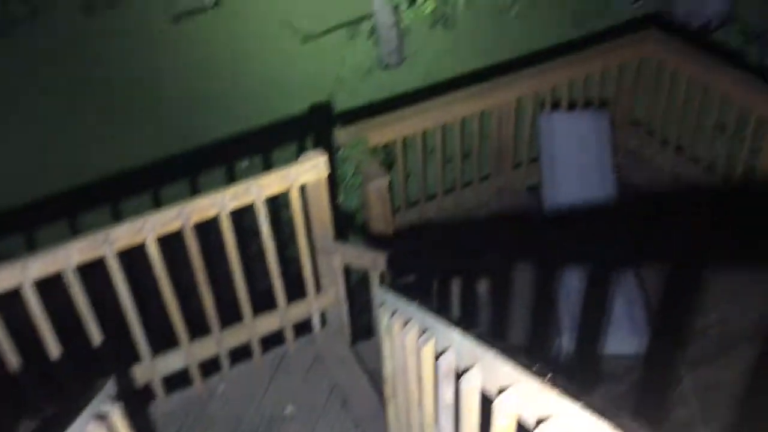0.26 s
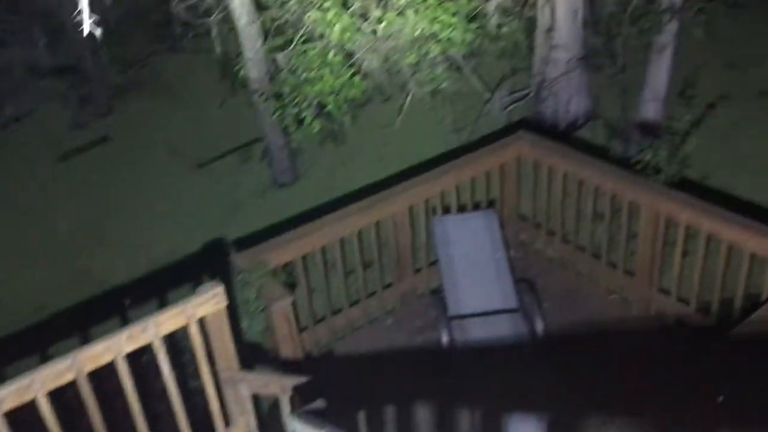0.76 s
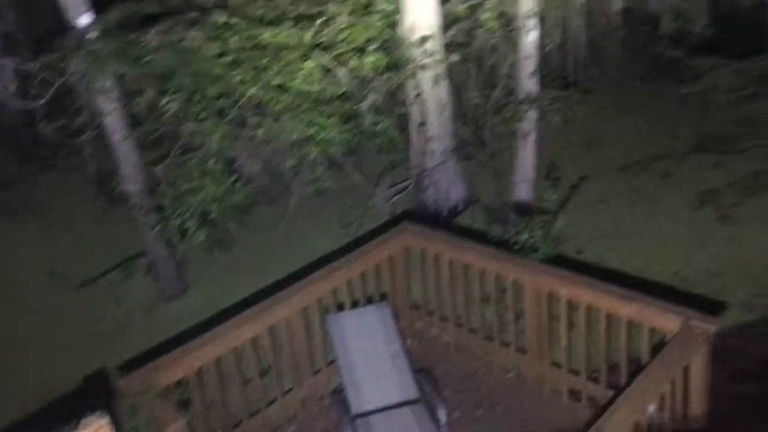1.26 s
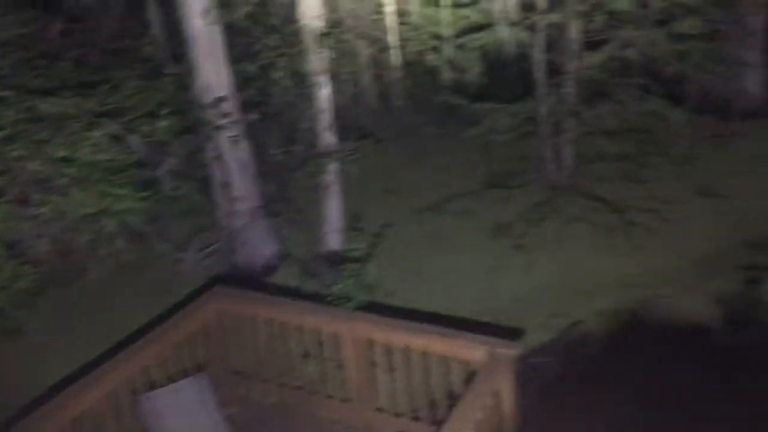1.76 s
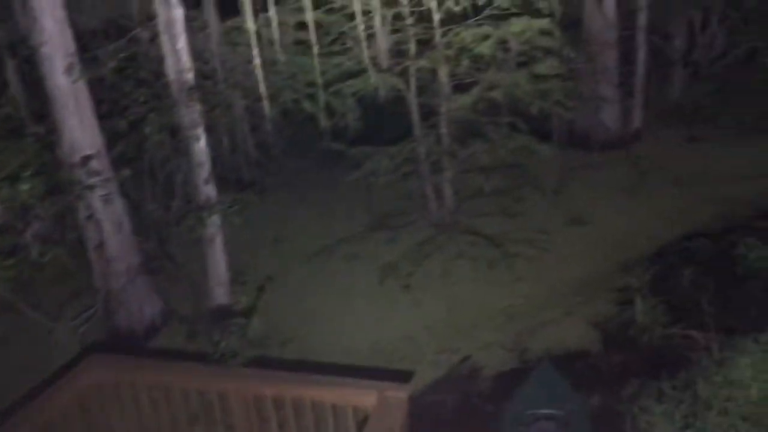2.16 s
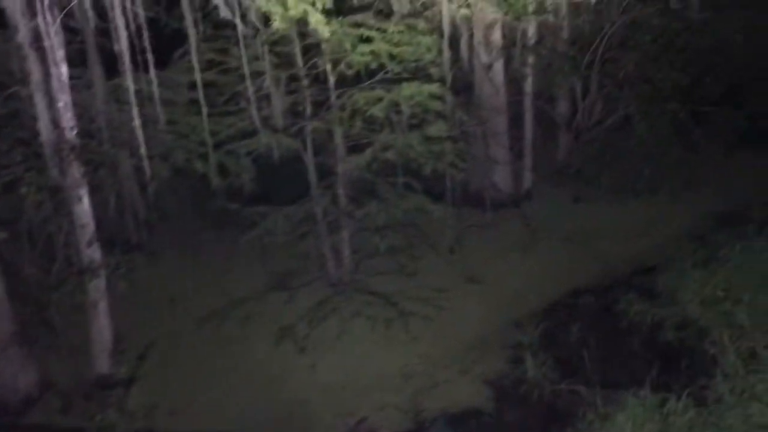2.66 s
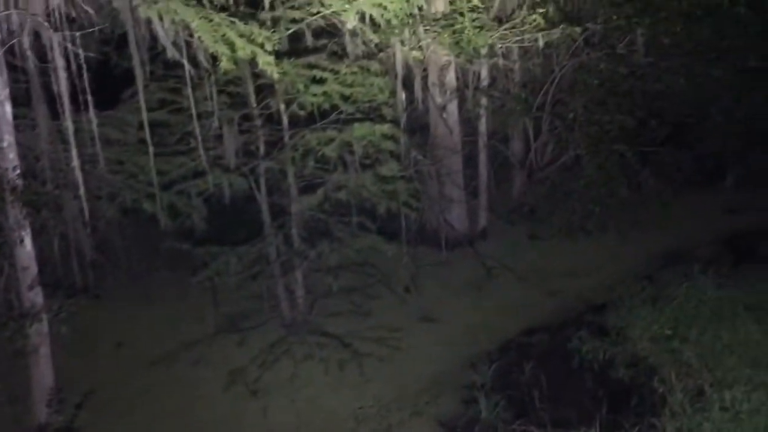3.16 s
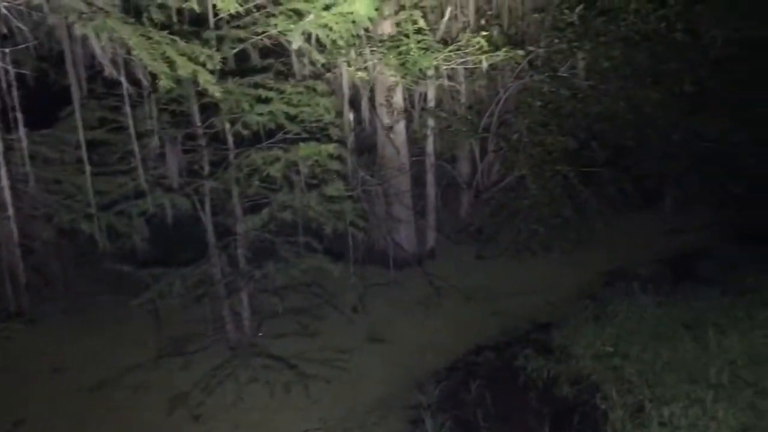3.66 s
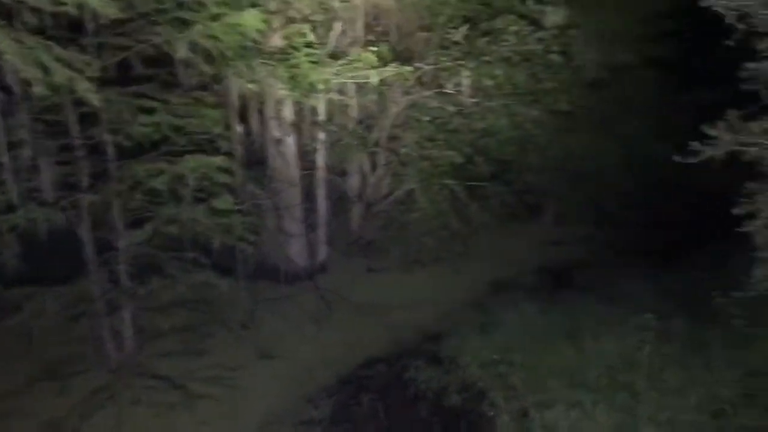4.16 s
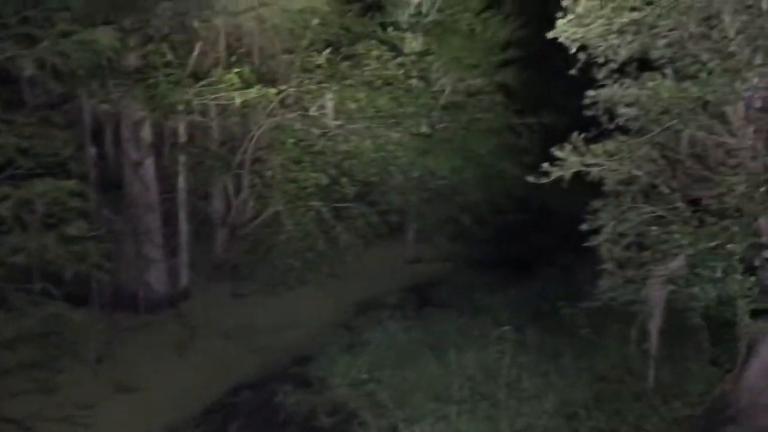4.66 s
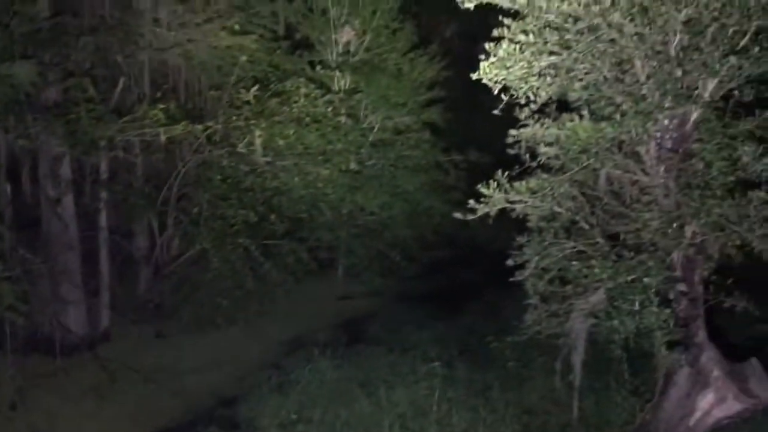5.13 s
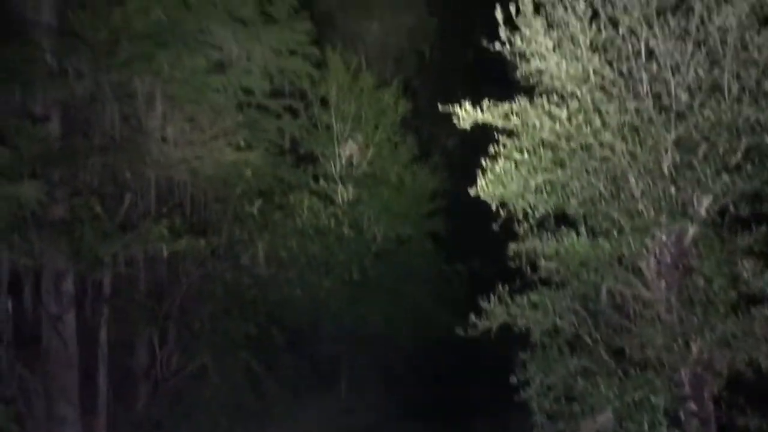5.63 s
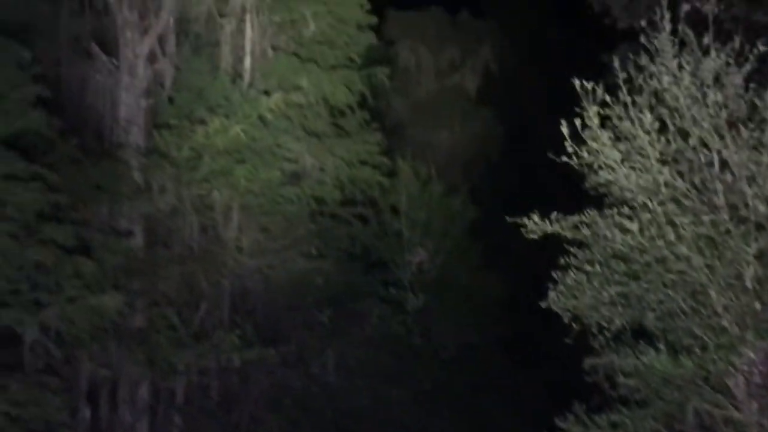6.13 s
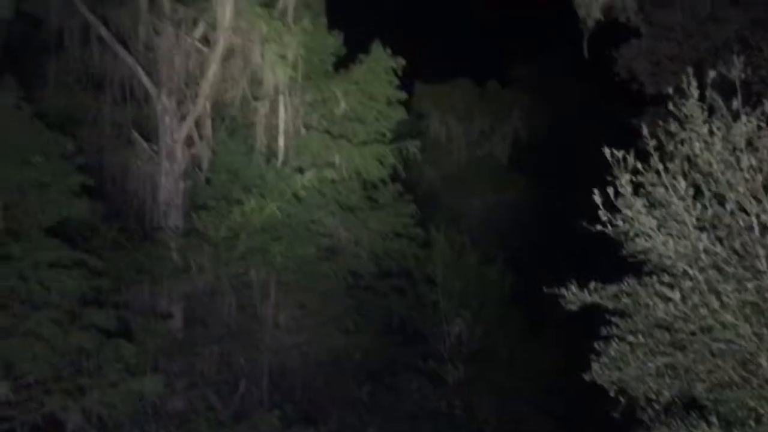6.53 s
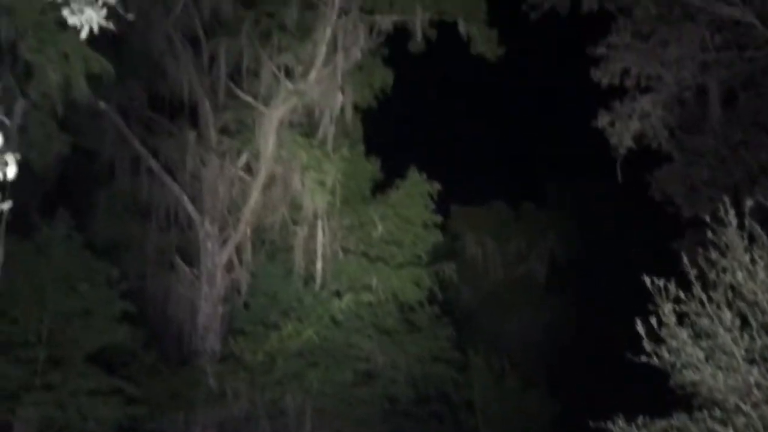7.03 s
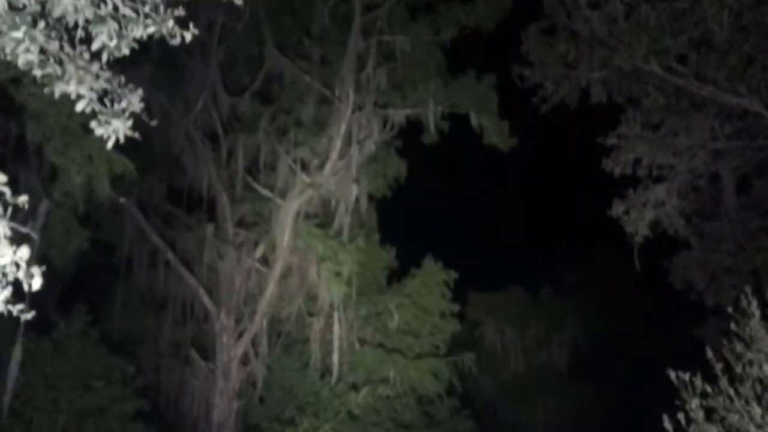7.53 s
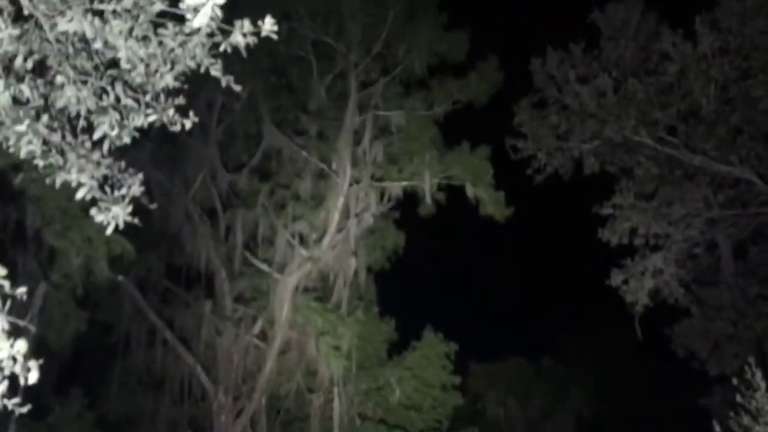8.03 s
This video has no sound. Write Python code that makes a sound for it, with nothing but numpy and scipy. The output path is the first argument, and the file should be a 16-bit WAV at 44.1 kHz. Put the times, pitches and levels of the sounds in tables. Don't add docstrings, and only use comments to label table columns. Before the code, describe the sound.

At night in a swamp, hundreds of frogs give raspy nasal quacks while crickets shimmer above and a distant engine hums faintly below.

```python
import sys
import numpy as np
from scipy import signal
from scipy.fft import rfft, irfft, next_fast_len
from scipy.io import wavfile
from scipy.ndimage import uniform_filter1d, minimum_filter1d

SR = 44100
rng = np.random.default_rng(int(sys.argv[2]) if len(sys.argv) > 2 else 0)


def log_audio(samples):
    frames = np.atleast_2d(samples).T
    limited = np.clip(frames, -1, 1)
    pcm = np.round(limited * 32767).astype(np.int16)
    wavfile.write(sys.argv[1], SR, pcm)


def voltage_ratio(decibels):
    exponent = np.asarray(decibels, float) / 20
    return 10 ** exponent


N = 365588
T = np.arange(N) / SR


def evened(x):
    return x / np.sqrt(np.mean(x ** 2) + 1e-20)


def curves(rows, t):
    s, *columns = np.transpose(rows)
    return [np.interp(t, s, c) for c in columns]


def read(points, hz):
    f, value = np.transpose(points)
    return np.interp(np.log(hz + 1), np.log(f + 1), value, left=-90, right=-90)


def colour(x, points):
    size = next_fast_len(N)
    gain = voltage_ratio(read(points, np.fft.rfftfreq(size, 1 / SR)))
    return evened(irfft(rfft(x, size) * gain, size)[:N])


def add(mix, s, sound):
    part = mix[round(s * SR):][:len(sound)]
    part += sound[:len(part)]


def ring(x, hz, width_hz):
    return signal.lfilter(*signal.iirpeak(hz, hz / width_hz, SR), x)


def drift(hz):
    steps = rng.standard_normal(600)
    return np.interp(T * hz, np.arange(600), steps)


def woods(x, t60_s, gap_s):
    t = np.arange(SR // 2) / SR
    tail = rng.standard_normal(len(t)) * voltage_ratio(-60 * t / t60_s) * (t > gap_s)
    return signal.fftconvolve(x, tail / np.linalg.norm(tail))[:len(x)]


def strokes(turns, duty):
    return np.sin(np.pi * np.clip(turns % 1 / duty, 0, 1))


# frequency in Hz, density in dB per Hz.
RUMBLE = [(16, -53), (28, -34), (43, -1), (70, 1.5), (92, -0.5), (144, -10), (233, -12), (270, -16),
          (326, -14), (371, -20.5), (599, -24.5), (900, -27.5), (1170, -41), (1980, -120)]
# time in seconds, level in dB.
RUMBLE_DB = [(0.0, -57.5), (1.6, -59.5), (3.3, -58.5), (8.29, -58)]


def road():
    return voltage_ratio(curves(RUMBLE_DB, T)[0]) * colour(rng.standard_normal(N), RUMBLE)


# time in seconds, pitch in Hz, level in dB.
MOTOR = [
    (4.9, 198, -89.5),
    (5.2, 198.6, -64.5),
    (5.9, 203.4, -70),
    (6.3, 201.6, -72.5),
    (7.0, 206, -69.5),
    (7.5, 204.8, -80),
    (7.9, 205, -86),
]


def steady_motor():
    hz, db = curves(MOTOR, T)
    tone = np.exp(2j * np.pi * np.cumsum(hz + 1.52 * drift(5)) / SR)
    return voltage_ratio(db) * (tone + 0.23 * tone ** 2).real


# time in seconds, shaft rate in Hz.
ENGINE = [
    (1.5, 40.35),
    (4, 43.92),
    (7, 47.07),
    (8.29, 48.4),
]
# frequency in Hz, width in Hz, level in dB.
PIPE = [(84, 2.9, -62.5), (89.54, 3.5, -59), (92.77, 2.6, -57), (168.8, 4.2, -66), (175.4, 4, -67),
        (182.7, 3.1, -65.5), (190.7, 3.1, -67), (143.5, 2, -72), (224.5, 9, -71), (259.8, 3.5, -68),
        (267, 3, -72.5), (274, 3.2, -71), (368.4, 10, -77), (281, 4.8, -72.5)]


def far_engine():
    shaft_hz = curves(ENGINE, T)[0]
    turn = 2 * np.pi * np.cumsum(shaft_hz + .5 * drift(12)) / SR
    engine = np.zeros(N)
    for order in 2, 3, 4, 5, 6, 8:
        power = sum(voltage_ratio(db - 11 * ((order * shaft_hz - hz) / width) ** 2) ** 2 for hz, width, db in PIPE)
        waver = voltage_ratio((1.5 + 0.19 * order) * drift(9))
        engine += np.sqrt(power) * waver * np.sin(order * turn)
    return engine


def far_traffic():
    fade = np.clip(T / ENGINE[0][0], 0, 1) * np.sqrt(2)
    return fade * (far_engine() + steady_motor()) + road()


# time in seconds, level between chirps in dB, swell with the near cricket in dB.
DRONE = [
    (0, -54.5, 1.5),
    (1.5, -55.5, 0),
    (2.65, -57, 0.5),
    (3.5, -56, 1.5),
    (4.8, -56.5, 1.5),
    (6.5, -56.5, 0.5),
    (7.3, -57.5, 2),
    (8.29, -58, 2.5),
]
# frequency in Hz, density in dB per Hz.
DRONE_COLOUR = [(4400, -60), (4900, -36.5), (5300, -21.5), (5830, -8.5), (6100, -3.5), (6450, 0), (6680, 4),
                (6850, -5), (7050, -8), (7250, -19), (7500, -19), (8000, -28), (8600, -59), (9500, -66)]
# frequency in Hz, density in dB per Hz.
OCTAVE_COLOUR = [(8000, 2.5), (8600, -1.5), (9300, -4), (10300, -8), (11300, -10.5), (11900, -7),
                 (12300, -2), (13300, -2.5), (13900, -11), (14200, -14), (15000, -12.5), (15800, -11.5)]
OCTAVE_DB = -76.5
SWELL_LAG_S, SWELL_S = 0.084, 0.067
TOP_DB, TOP_SWING_DB = -14.5, 6


def crickets(count=36):
    song, octave = np.zeros(N), np.zeros(N)
    for k, (pitch, phase, pace) in enumerate(rng.random((count, 3))):
        hz = 5750 + 1400 * (k + pitch) / count
        strokes_per_s = 90.6 if k % 3 == 0 else 34 + 30 * pace
        chirp = 0.1 + strokes((2.6 + 0.871 * pace) * T + phase * 7, 0.56)
        beat = strokes(strokes_per_s * T + phase, 0.68) * chirp * voltage_ratio(read(DRONE_COLOUR, hz))
        turn = 2 * np.pi * np.cumsum(hz + 45 * drift(40)) / SR
        song += beat * np.sin(turn)
        octave += beat * np.sin(2 * turn)
    far = colour(rng.standard_normal(N), DRONE_COLOUR)
    song = evened(far + voltage_ratio(-3) * evened(song + .9 * woods(song, .3, .006)))
    high = colour(rng.standard_normal(N), OCTAVE_COLOUR) + voltage_ratio(-2.5) * evened(octave)
    mass_db, swell_db = curves(DRONE, T)
    answer = sum(np.exp(-((T - s - SWELL_LAG_S) / SWELL_S) ** 2) for s, *_ in CHIRPS)
    mass_db = mass_db + swell_db * answer
    top = strokes(47 * T, 0.57) * np.sin(2 * np.pi * np.cumsum(6965 + 14 * drift(30)) / SR)
    song = song + voltage_ratio(TOP_DB + TOP_SWING_DB * drift(3)) * top
    return voltage_ratio(mass_db + 2.5) * song + voltage_ratio(OCTAVE_DB) * high


# time in seconds, level in dB, pitch in Hz, lead on an even beat in strokes.
TRILL = [(0.05, -69.5, 8175, 0.3), (0.3, -67.5, 8190, 0.32), (0.8, -67.5, 8275, 0.54),
         (1.68, -60.3, 8296, 0.73), (2.3, -65.0, 8297, 0.86), (2.95, -63.3, 8297, 0.96),
         (3.9, -67.5, 8290, 0.77), (4.55, -65.8, 8285, 0.61), (5.3, -65.8, 8285, 0.39),
         (5.9, -68.5, 8303, 0.2), (6.12, -76, 8290, 0.21)]
# time in seconds, level in dB, pitch in Hz.
RETURN = [(0, -82, 8000), (1.1, -77, 8050), (1.7, -76, 7950), (2.6, -79, 7870), (3.8, -74.5, 7890),
          (4.6, -75.5, 7900), (4.95, -80, 7860), (5.45, -76, 7830), (5.75, -73.5, 7950), (6.06, -74, 8050),
          (6.12, -85, 8050)]
TRILL_PER_S = 60.2


def trill():
    db, hz, lead = curves(TRILL, T)
    pace = TRILL_PER_S + np.gradient(lead) * SR
    u = (TRILL_PER_S * T + lead + .5) % 1 - .5
    arch = (hz + 34 + 9 * drift(30)) * u - 750 * u ** 3
    slip = 1.1 * drift(25) + .8 * drift(60) + 2 * np.pi * np.cumsum(22 * drift(4)) / SR
    stroke = np.exp(-(u / .31) ** 2) * np.cos(np.pi * u) ** 2
    tone = evened(stroke * np.sin(2 * np.pi * arch / pace + slip) * voltage_ratio(1.5 * drift(27)))
    back_db, back_hz = curves(RETURN, T)
    back = evened(stroke * np.sin(2 * np.pi * back_hz * u / pace - 30 * u ** 2 + 1.8 * drift(40)))
    tone = tone * voltage_ratio(db - .6) + voltage_ratio(back_db) * np.roll(back, 280)
    tone = tone * np.clip((TRILL[-1][0] + .04 - T) * 12, 0, 1)
    return tone + voltage_ratio(-13) * woods(tone, .15, .004)


# time in seconds, level in dB.
TICKS = [
    (2.391, -63),
    (2.395, -66),
    (2.399, -67),
    (2.404, -69),
]


def rustle():
    out = np.zeros(N)
    for s, db in TICKS:
        add(out, s, voltage_ratio(db) * rng.standard_normal(90) * np.hanning(90))
    return ring(ring(out, 14500, 4500), 14500, 4500)


# time in seconds, pitch in Hz, level in dB.
KNOCK = (6.364, 590, -48)


def knock():
    out = np.zeros(N)
    s, hz, db = KNOCK
    t = np.arange(600) / SR
    add(out, s, voltage_ratio(db - 60 * t / 0.0094) * np.sin(2 * np.pi * hz * t))
    return out


# start in seconds, number of strokes, level in dB.
CHIRPS = [(.203, 6, -55.7), (.516, 5, -55.5), (.997, 5, -54.1), (1.441, 6, -56.1), (1.796, 5, -56.3),
          (2.128, 5, -57.6), (2.409, 6, -59.1), (2.758, 6, -58.8), (3.276, 4, -56.1), (3.606, 5, -53.9),
          (3.928, 5, -56.7), (4.26, 4, -55.6), (4.567, 5, -58.4), (4.927, 6, -58.5), (5.237, 4, -54.6),
          (5.567, 5, -55.8), (5.927, 5, -57.2), (6.386, 5, -56.9), (6.699, 4, -56.8), (7.052, 5, -54.6),
          (7.373, 5, -54.4), (7.708, 5, -54.3), (8.066, 5, -54.4)]
CHIRP_HZ, STROKES_PER_S = 6210, 38.6


def near_cricket():
    out = np.zeros(N)
    for s, count, db in CHIRPS:
        length_s = count / STROKES_PER_S
        t = np.arange(int(length_s * SR)) / SR
        turns = t * STROKES_PER_S
        sag_hz = 40 * (.4 - turns % 1)
        tone = np.exp(2j * np.pi * np.cumsum(CHIRP_HZ + sag_hz + 24 * drift(60)[:len(t)]) / SR)
        beat = np.tanh(1.5 * strokes(turns, .8)) * (.65 + .5 * t / length_s)
        voice = voltage_ratio(1.5 * (db + 57.5) - 50.5) * tone + voltage_ratio(-78) * tone ** 2
        add(out, s, beat * voice.real)
    return out + voltage_ratio(-8) * woods(out, .15, .008)


# peak in seconds, rise in seconds, fall in seconds, level in dB, brightness in dB.
WAVES = [(.1, 0.18, 0.1, -49, -1.5), (.56, 0.12, 0.052, -48.5, -4.5), (.75, 0.42, 0.61, -56, 0),
         (1.19, 0.076, 0.47, -60.5, 9), (1.45, 0.36, 0.3, -62.5, -7.5), (1.74, 0.56, 0.1, -57.5, 6.5),
         (2.26, 0.26, 0.37, -55, 1), (2.55, 0.19, 0.42, -58.5, 9.5), (2.89, 0.27, 0.2, -55, -3.5),
         (3.388, 0.12, 0.47, -54.5, 4.5), (3.72, .12, 0.32, -56.5, 1.5), (4.45, 0.12, 0.11, -50.5, -2.5),
         (4.65, 0.058, 0.36, -51.5, 3), (5.22, 0.15, 0.24, -56.5, 5), (5.46, 0.13, 0.065, -52, 0),
         (5.76, 0.49, .08, -54.5, -2.5), (6.08, 0.17, 0.18, -53.5, -1), (6.35, 0.13, 0.11, -54.5, 5),
         (6.72, 0.29, 0.11, -55, 6), (6.96, 0.23, 0.37, -52, 0.5), (7.4, 0.073, 0.24, -57, -2),
         (7.68, 0.34, 0.77, -54, 1), (7.98, 0.54, 0.1, -59, 9.5), (8.24, 0.081, 0.31, -58.5, -4)]
# peak in seconds, level in dB.
SHRILL = [
    (2.05, -62),
    (3.08, -65),
    (3.92, -71.5),
    (4.08, -68),
    (5.92, -58),
]
SHRILL_RISE_S, SHRILL_FALL_S, SHRILL_BRIGHT_DB = 0.12, 0.19, 13
MURMUR_DB, WAVE_EDGE_DB = -64.5, -9.5


def wave_levels(t):
    shrill = [(s, SHRILL_RISE_S, SHRILL_FALL_S, db, SHRILL_BRIGHT_DB) for s, db in SHRILL]
    peak, rise, fall, db, bright_db = np.transpose(WAVES + shrill)[:, :, None]
    away = np.maximum((peak - t) / rise, (t - peak) / fall)
    power = voltage_ratio(db + WAVE_EDGE_DB * away) ** 2
    total = power.sum(0) + voltage_ratio(MURMUR_DB) ** 2
    return 10 * np.log10(total), (power * bright_db).sum(0) / total


def pulses(length_s, first_hz, last_hz, rough):
    u = np.arange(int(length_s * SR)) / (length_s * SR)
    shake = uniform_filter1d(rng.standard_normal(SR // 4), 150)[:len(u)]
    pace_hz = last_hz + (first_hz - last_hz) * (1 - u) ** 1.6
    turns = np.cumsum(pace_hz * (1 + 1.5 * rough * shake)) / SR
    clicks = np.diff(np.floor(turns), prepend=0) * (1 + 6 * rough * shake)
    return clicks * np.sin(np.pi / 2 * np.minimum(u / 0.5, 1)) ** 1.25 * np.minimum((1 - u) / 0.15, 1)


# frequency in Hz, density in dB per Hz.
FROG_COLOUR = [(600, -34), (750, -49), (880, -19), (1000, -11.5), (1130, -5), (1270, -4.5), (1880, -2),
               (2400, 1), (2680, -0.5), (3100, -7.5), (3800, -18.5), (4800, -29), (5300, -42), (6800, -62)]
UPPER_FOLLOW, OVERTONE_FOLLOW = 0.85, 0.99
UPPER_BRIGHT = 0.34


def chorus(count=480):
    voices = np.zeros((10, N + SR))
    for k, (at, long, pitch, far) in enumerate(rng.random((count, 4))):
        quack = pulses(.09 + .08 * long, 290 + 110 * pitch, 205 + 90 * pitch, .15)
        add(voices[k % 10], at * (N + SR) / SR, voltage_ratio(-16 * far) * quack)
    crowd = 0
    for voice, throat in zip(voices, np.linspace(.86, 1.16, 10)):
        call = voice + 3.2 * ring(voice, 2450 * throat, 130) + 1.8 * ring(voice, 1350 * throat, 130)
        crowd = crowd + call + woods(call, .5, .008)
    hz, t, z = signal.stft(crowd[SR:], SR, nperseg=512, noverlap=384)
    power = uniform_filter1d(abs(z) ** 2, size=40, axis=1)
    z = z / np.sqrt(uniform_filter1d(power, size=5, axis=0) + 1e-20)
    low_db, bright_db = wave_levels(t)
    swell_db = low_db - low_db.mean()
    up_db = (UPPER_FOLLOW - 1) * swell_db + UPPER_BRIGHT * bright_db
    over_db = (OVERTONE_FOLLOW - 1) * swell_db + bright_db
    up = np.clip((hz[:, None] - 1750) / 300, 0, 1)
    over = np.clip((hz[:, None] - 2850) / 300, 0, 1)
    wave_db = low_db + (up - over) * (up_db - up_db.mean()) + over * (over_db - over_db.mean())
    shape = voltage_ratio(read(FROG_COLOUR, hz))[:, None]
    shape = shape / np.sqrt(np.sum(shape[(hz > 900) & (hz < 1900)] ** 2) * 4 / 3)
    return signal.istft(z * shape * voltage_ratio(wave_db - 0.33), SR, nperseg=512, noverlap=384)[1][:N]


# start in seconds, length in seconds, middle pitch in Hz, level in dB.
RISING = [(2.556, 0.1, 2455, -58), (3.313, 0.25, 2474, -56.5), (4.602, 0.09, 2200, -54.5),
          (5.159, 0.11, 2504, -56), (5.997, 0.13, 2396, -50.5), (6.307, 0.093, 2428, -53),
          (6.5, 0.12, 2730, -57.5), (6.94, 0.11, 2330, -52), (1.48, 0.15, 2930, -60),
          (4.76, 0.19, 1155, -60), (5.22, 0.071, 1575, -65), (2.37, 0.078, 3550, -70),
          (2.39, 0.082, 2600, -81), (4.04, 0.1, 2960, -67), (5.76, 0.047, 2505, -65),
          (3.83, 0.054, 1170, -68)]
STEADY = [(.013, 0.13, 1476, -62), (.03, 0.14, 2476, -50), (.48, 0.2, 2327, -55), (1.653, 0.071, 2403, -61),
          (1.663, 0.14, 2814, -55.5), (2.21, 0.15, 1327, -65), (2.219, 0.16, 2504, -55.5),
          (2.221, 0.092, 2272, -63), (2.661, 0.086, 2360, -55), (2.834, 0.11, 2340, -59),
          (3.603, 0.18, 2682, -54.5), (4.38, 0.059, 2120, -58), (4.819, 0.087, 2437, -54),
          (6.303, 0.089, 1438, -59), (6.364, 0.082, 2840, -59.5), (6.677, 0.087, 1577, -58),
          (6.888, 0.16, 1265, -59.5), (7.389, 0.068, 2580, -58.5), (7.775, 0.14, 2250, -54.5),
          (8.032, 0.051, 2606, -53.5), (8.105, 0.063, 2600, -53), (0, 0.12, 2360, -51.5),
          (.46, 0.095, 2305, -52.5), (1.11, 0.075, 1168, -60), (5.27, 0.039, 2900, -60),
          (5.65, 0.097, 3320, -70), (.93, 0.11, 2530, -63), (.5, 0.11, 1300, -66), (6.94, 0.071, 1070, -58),
          (3.44, 0.12, 2480, -58.5), (7.66, 0.1, 2504, -62), (3.64, 0.15, 2470, -57.5),
          (2.68, 0.23, 2330, -58)]
FALLING = [(.64, 0.11, 2270, -58.5), (1.175, 0.03, 2800, -61), (1.183, 0.035, 3170, -58),
           (1.2, 0.17, 2435, -59.5), (2.051, 0.13, 2355, -61), (2.4, 0.11, 2940, -58),
           (2.552, 0.15, 2680, -56.5), (4.352, 0.17, 2360, -55), (4.58, 0.16, 1284, -59.5),
           (4.652, 0.13, 2480, -54), (4.947, 0.088, 2550, -60), (5.44, 0.12, 2580, -58),
           (5.705, 0.058, 2283, -55), (7.259, 0.053, 2318, -51.5), (7.307, 0.057, 2485, -53),
           (7.383, 0.056, 2350, -53.5), (7.632, 0.094, 2420, -55.5), (6.863, .026, 4100, -74),
           (6.775, 0.02, 4430, -75), (1.37, 0.054, 2780, -60), (2.5, 0.11, 1690, -61),
           (2.79, 0.039, 2350, -60), (3.85, 0.073, 3400, -66.5), (4.03, 0.051, 1520, -64),
           (4.59, 0.095, 973, -64)]
DROPPING = [(.41, .09, 2480, -60), (.53, 0.086, 2420, -53), (2.89, .05, 2400, -60),
            (3.48, 0.042, 2250, -57), (3.98, 0.072, 2280, -60), (4.36, 0.055, 2520, -56),
            (4.42, 0.082, 2080, -54), (4.59, 0.032, 1500, -61), (4.7, 0.077, 2210, -63),
            (5.345, 0.083, 2720, -53), (5.4, .08, 2400, -53), (5.43, 0.064, 1400, -68),
            (5.69, .06, 1400, -61), (6.62, .07, 2280, -54.5), (6.72, .05, 2480, -57),
            (6.89, 0.084, 2150, -52), (6.93, 0.082, 1250, -61), (8.17, 0.073, 2710, -59),
            (3.4, .05, 1580, -63), (3.83, .05, 1420, -61)]
DIVING = [
    (1.15, 0.025, 3170, -59.5),
    (1.14, .03, 3950, -73),
    (1.195, .03, 4050, -73),
    (1, .025, 3700, -64),
    (5.435, .04, 1700, -63),
]
RISE_HZ_PER_S, FALL_HZ_PER_S, DROP_HZ_PER_S, DIVE_HZ_PER_S = 813, -850, -1700, -7000


def near_quack(length_s, hz, glide_hz_per_s, db):
    u = np.arange(int(length_s * SR)) / (length_s * SR)
    waver = evened(uniform_filter1d(rng.standard_normal(SR // 2), 500))[:len(u)]
    turn = 2 * np.pi * np.cumsum(hz + glide_hz_per_s * length_s * (u - .5) + 32 * waver) / SR
    pace_hz = (230 + 90 * rng.random()) * (1.2 - 0.318 * u + 0.013 * waver)
    throb = np.exp(.7 * np.cos(2 * np.pi * np.cumsum(pace_hz) / SR))
    rasp = evened(signal.oaconvolve(rng.standard_normal(SR // 2), np.hanning(300), "same"))[:len(u)]
    throb = throb * voltage_ratio(2.5 * rasp - .5)
    turn = turn + .3 * rasp[::-1]
    quack = voltage_ratio(db + 1.5) * np.sin(np.pi * u) ** 0.23 * throb * np.sin(turn)
    quack = np.pad(quack, (0, SR // 2))
    return quack + voltage_ratio(-4) * woods(quack, 0.22, 0.011)


def near_frogs():
    out = np.zeros(N)
    groups = [(RISING, RISE_HZ_PER_S), (STEADY, 0), (FALLING, FALL_HZ_PER_S),
              (DROPPING, DROP_HZ_PER_S), (DIVING, DIVE_HZ_PER_S)]
    for calls, glide in groups:
        for s, length_s, hz, db in calls:
            add(out, s, near_quack(length_s, hz, glide, db))
    return signal.sosfilt(signal.butter(4, 900, "high", fs=SR, output="sos"), out)


# time into the call in seconds, level in dB, throat pulses per second.
NEAREST = [
    (0, -62, 385),
    (.008, -53, 378),
    (.043, -52, 379),
    (.056, -46, 300),
    (.082, -46, 268),
    (.086, -41.5, 259),
    (.102, -41, 256),
    (.122, -42.5, 247),
    (.128, -56, 230),
]
# start in seconds, level in dB.
NEAREST_CALLS = [
    (7.477, 1.3),
    (8.217, -6.5),
]
# resonance in Hz, width in Hz, level in dB.
SAC = [
    (1380, 560, 0),
    (2270, 700, 0.5),
]


def nearest_frog():
    out = np.zeros(N)
    t = np.arange(int(NEAREST[-1][0] * SR)) / SR
    db, hz = curves(NEAREST, t)
    band = signal.butter(4, [1150, 2720], "band", fs=SR, output="sos")
    for s, call_db in NEAREST_CALLS:
        turns = np.cumsum(hz * (1 + 0.0077 * drift(70)[:len(t)])) / SR + 0.3
        clicks = np.diff(np.floor(turns), prepend=0)
        clicks = clicks * voltage_ratio(drift(200)[:len(t)])
        voice = 0
        for k, (f, width, gain_db) in enumerate(SAC):
            rung = ring(ring(ring(clicks, f, 4.1 * width), f, width), f, width)
            voice = voice + (-1) ** k * voltage_ratio(gain_db) * rung
        add(out, s, evened(signal.sosfilt(band, voice)) * voltage_ratio(db + call_db))
    return out + voltage_ratio(-13) * woods(out, .2, .01)


def scene():
    insects = crickets() + trill() + near_cricket()
    frogs = chorus() + near_frogs() + nearest_frog()
    return (far_traffic() + insects + rustle() + knock() + frogs)[None]


def masked(x):
    hz, t, z = signal.stft(x, SR, nperseg=1024, noverlap=768)
    column_hz = hz[:, None]
    power = uniform_filter1d(uniform_filter1d(abs(z) ** 2, size=7, axis=0), size=5, axis=1)
    level_db = 10 * np.log10(power + 1e-20)
    loud_db = -minimum_filter1d(-level_db, size=55, axis=0, origin=27)
    upper_db = np.where(column_hz > 7400, level_db, -200)
    upper_db = -minimum_filter1d(-upper_db, size=55, axis=0, origin=27)
    loud_db = uniform_filter1d(np.where(column_hz > 8400, upper_db, loud_db), size=25, axis=1)
    reach_db = np.interp(hz, [8350, 8450, 9000, 9700, 10100, 11000, 13900, 14300, 15700],
                         [28.5, 24, 22, 24.5, 25, 31, 13, 14.5, 16.5])[:, None]
    frogs_db = uniform_filter1d(level_db[(hz > 2900) & (hz < 4500)].mean(0), size=9)
    lift = np.interp(hz, [8300, 8700, 10000, 10600], [0, 1, 1, 0])[:, None]
    reach_db = reach_db + lift * (frogs_db - frogs_db.mean())
    cells = rng.standard_normal((len(hz) // 4 + 1, len(t) // 4 + 1))
    chance = np.kron(uniform_filter1d(cells, size=2, axis=1), np.ones((4, 4)))[:len(hz), :len(t)]
    reach_db = reach_db + 4.5 * chance
    keep = np.clip((level_db - loud_db + reach_db) / 0.84, .02, 1)
    keep = np.where((column_hz > 7300) & (abs(column_hz - 12500) > 1500), keep, 1)
    return signal.istft(z * keep, SR, nperseg=1024, noverlap=768)[1][:N]


def top_cut(x):
    return signal.sosfilt(signal.butter(12, 15750, fs=SR, output="sos"), x)


def record(dry):
    mix = masked(dry[0])[None]
    return top_cut(mix)


dry = scene()
out = record(dry)
log_audio(out)
```